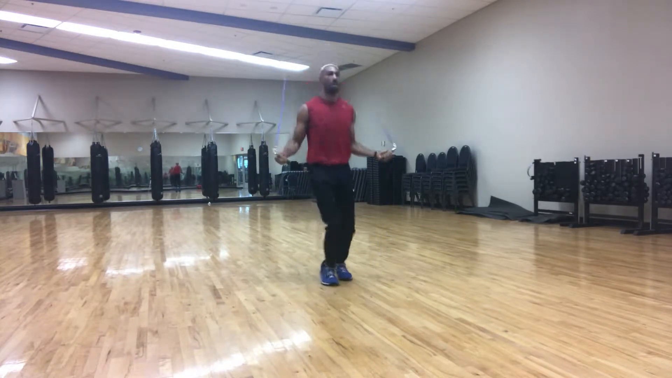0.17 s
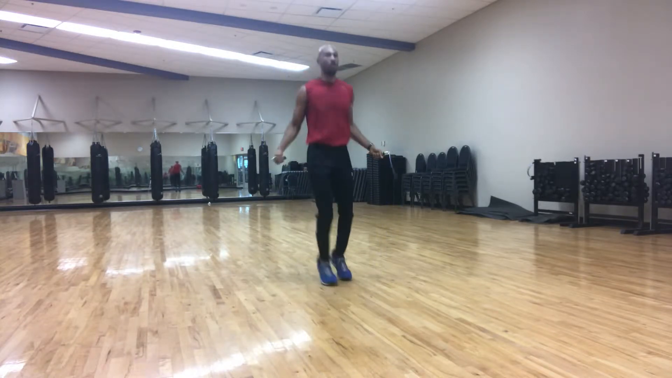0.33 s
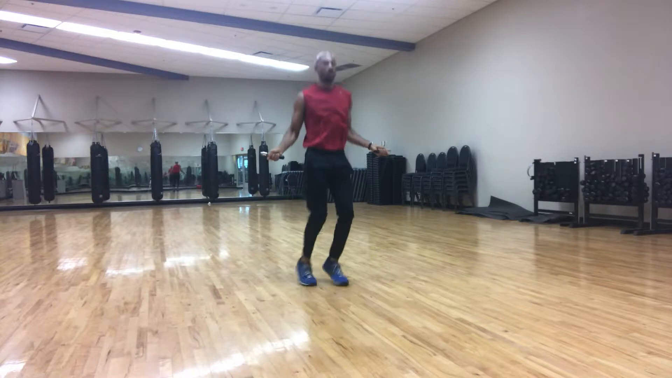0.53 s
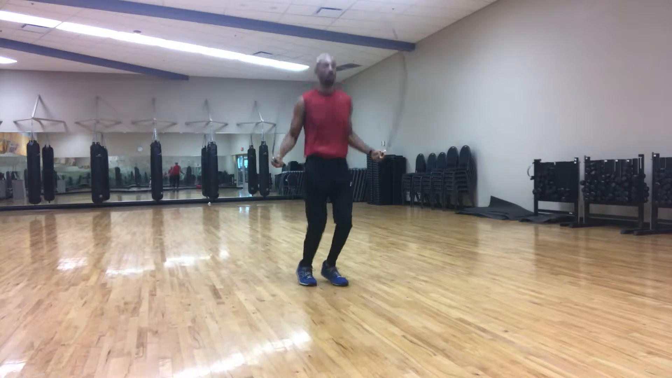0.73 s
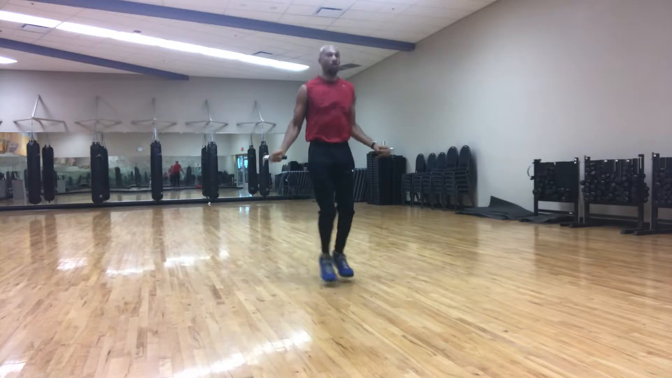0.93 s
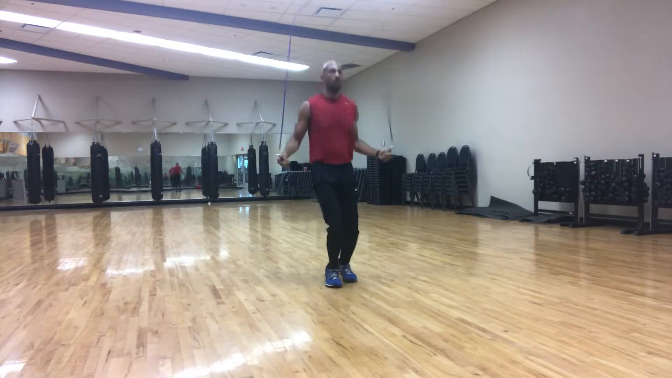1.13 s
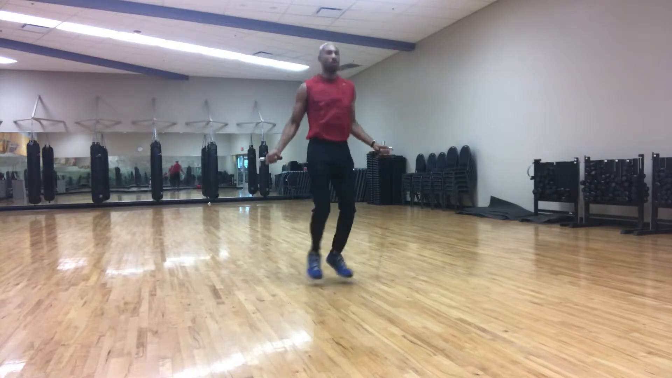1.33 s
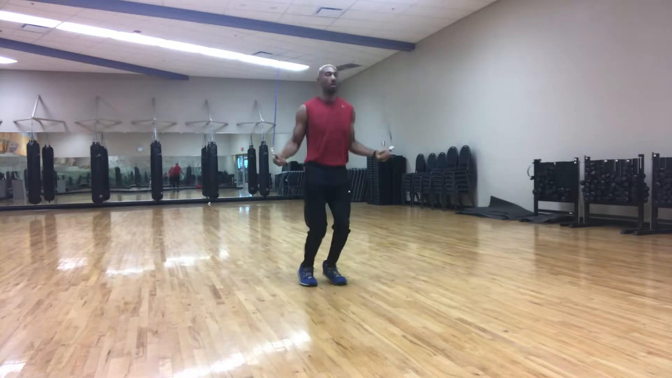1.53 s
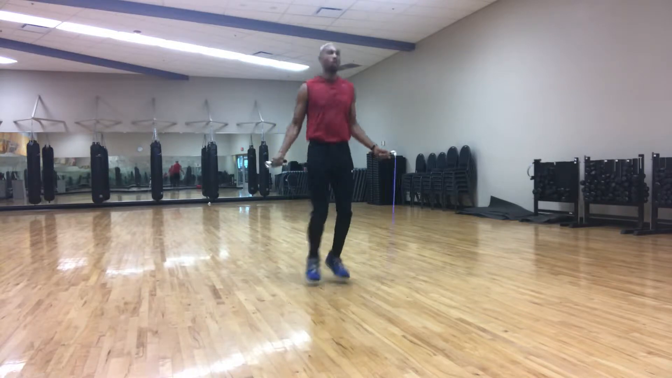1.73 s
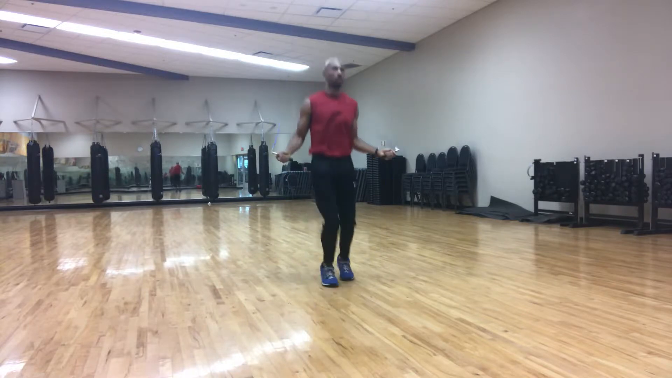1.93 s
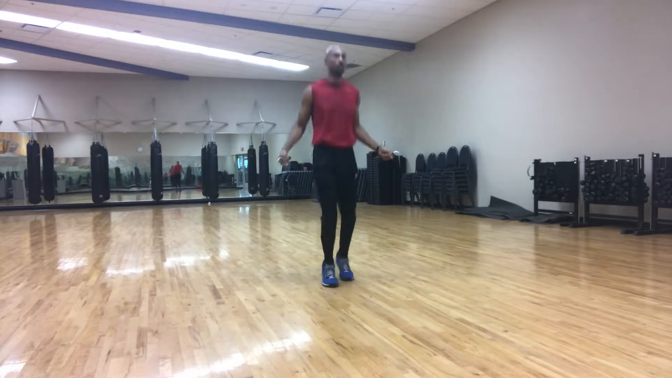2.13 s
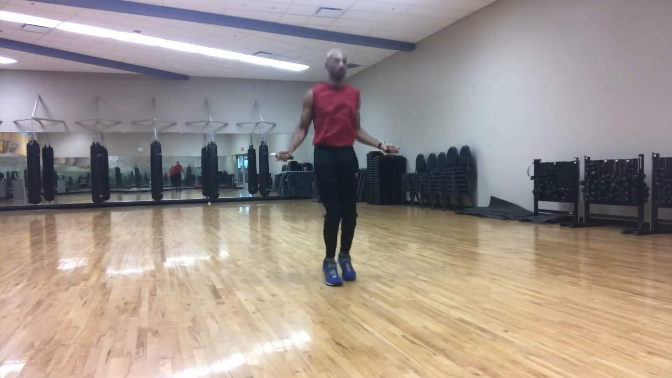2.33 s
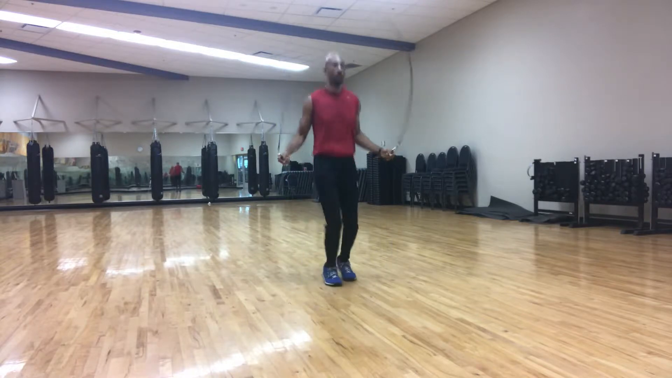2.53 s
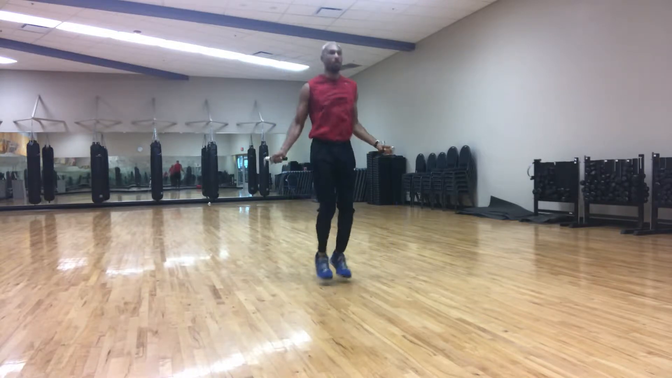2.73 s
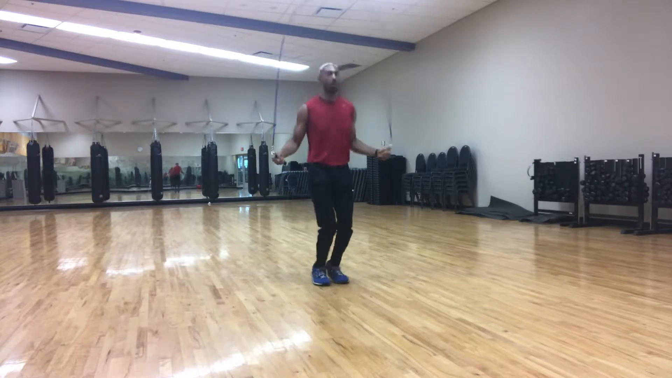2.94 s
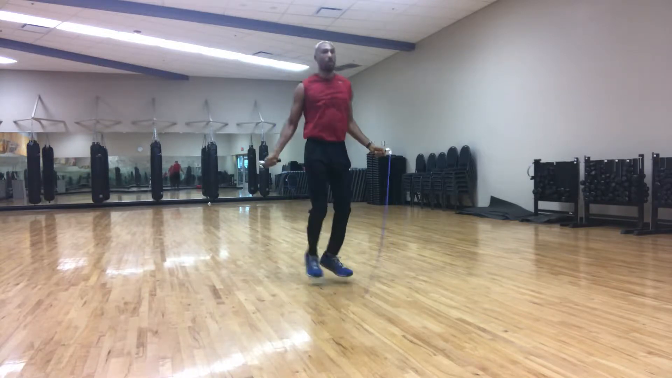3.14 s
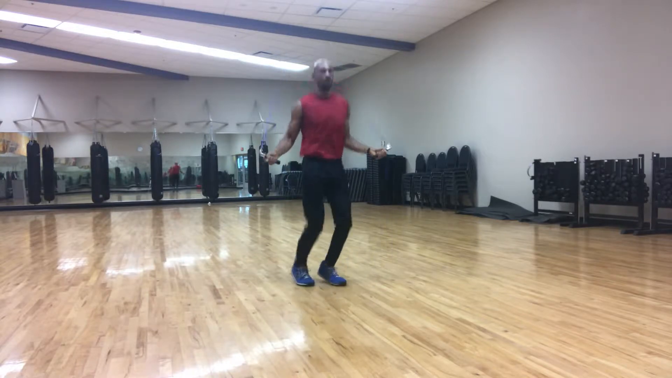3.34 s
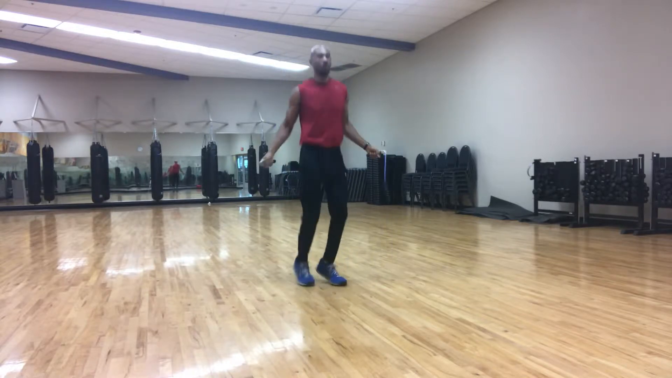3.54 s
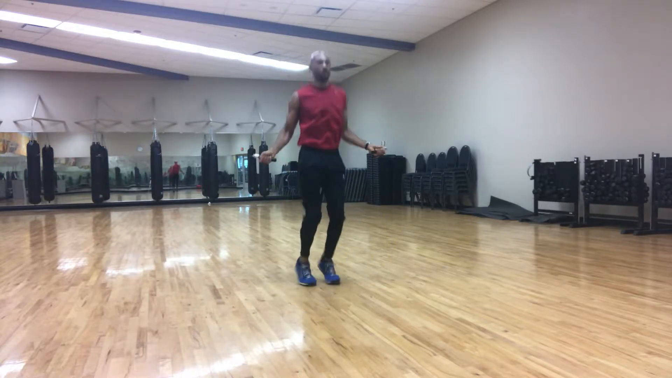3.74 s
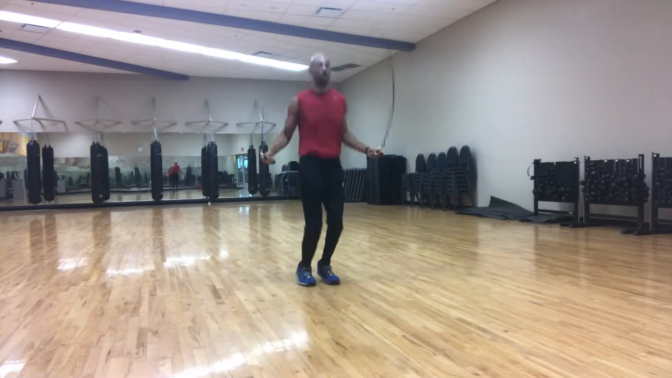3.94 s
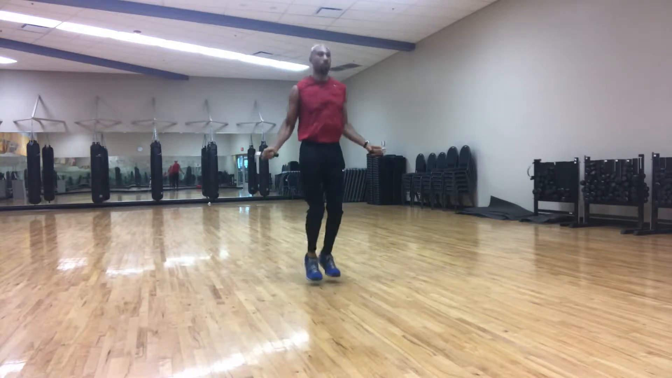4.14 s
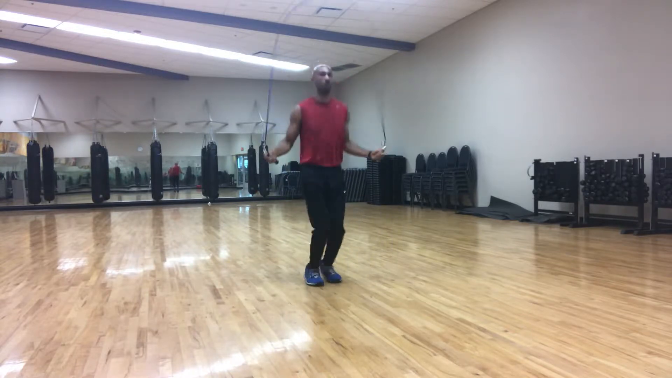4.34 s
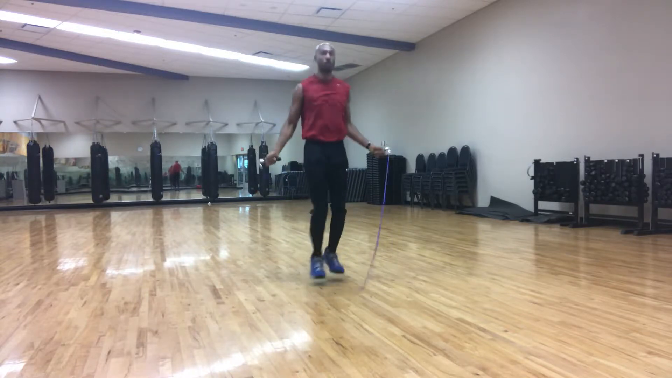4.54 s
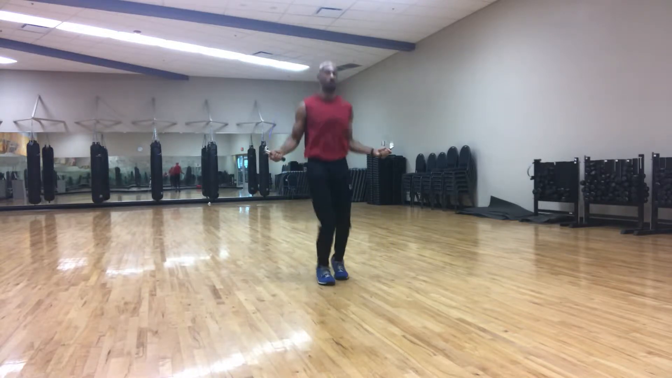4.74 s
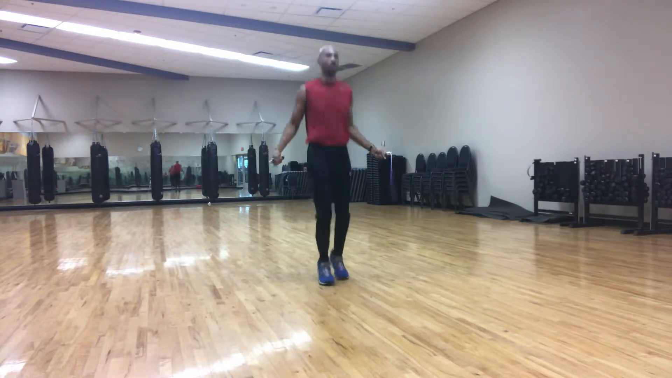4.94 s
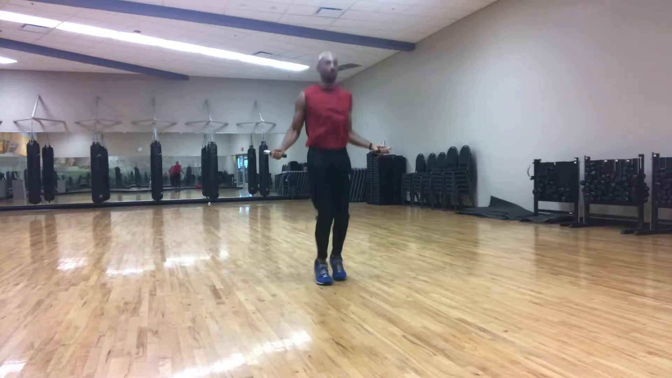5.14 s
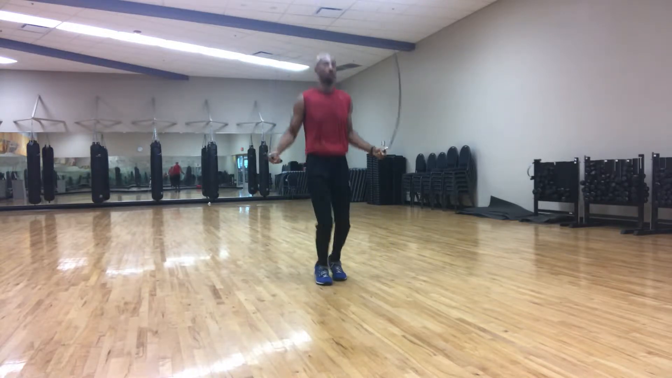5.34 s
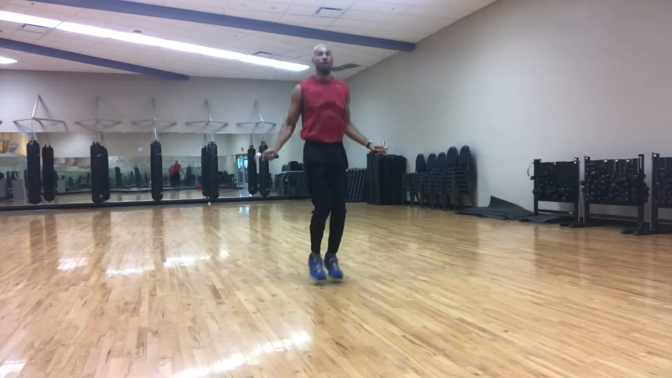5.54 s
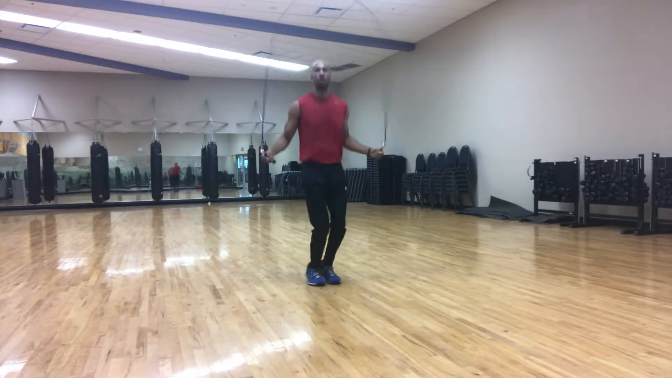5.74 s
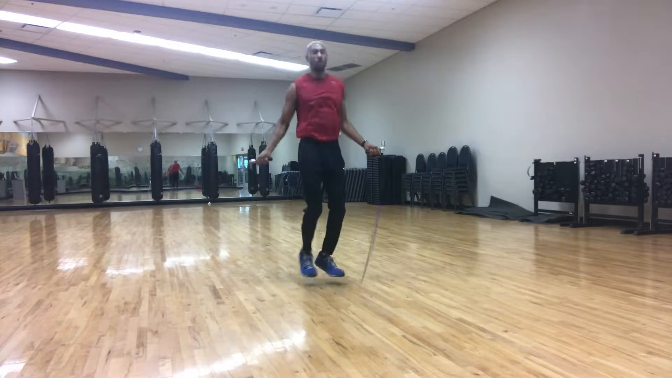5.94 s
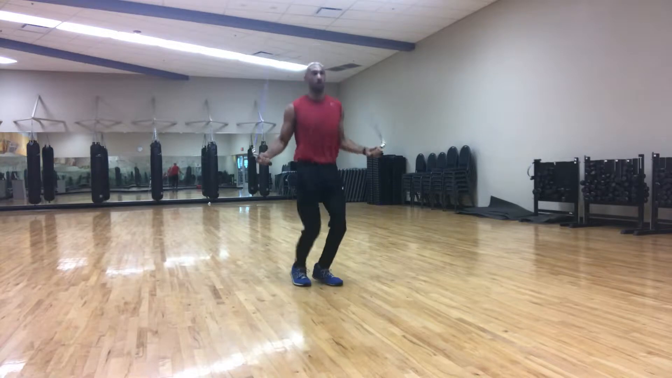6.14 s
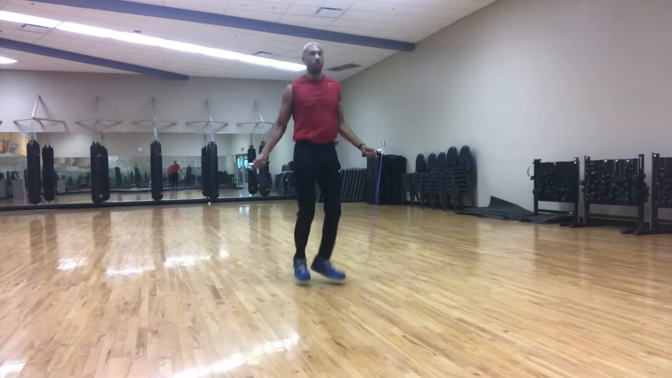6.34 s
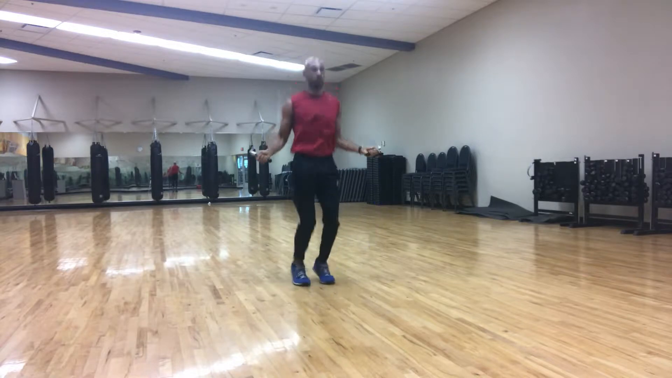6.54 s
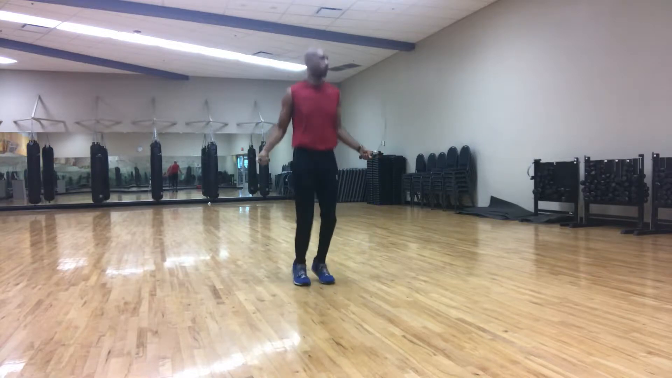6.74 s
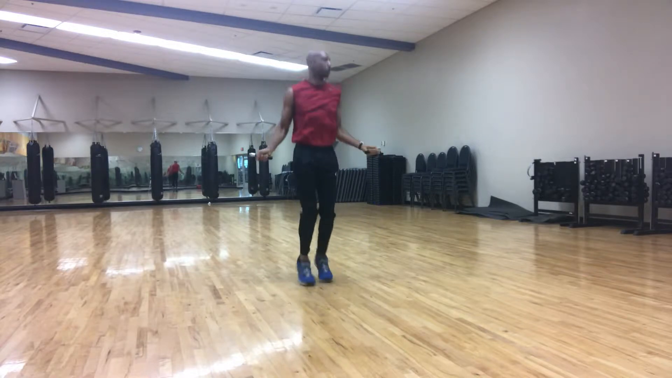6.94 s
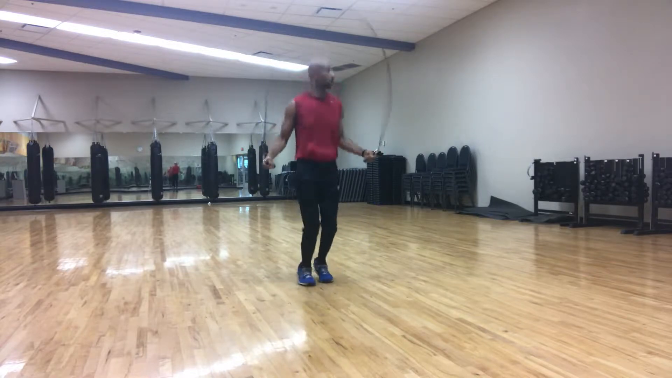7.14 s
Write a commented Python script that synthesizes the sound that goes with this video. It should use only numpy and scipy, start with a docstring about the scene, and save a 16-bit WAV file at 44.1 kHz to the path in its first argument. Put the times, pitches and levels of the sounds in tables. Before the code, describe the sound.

A jump rope cracks on a wooden floor about twice a second, each slap followed by thumping shoes, in an echoing gym.

```python
"""A large gym with a sprung wooden floor, where a heavy jump rope turns a little over twice a second.
Ventilation rumbles underneath. The rope hums through the air and cracks on the boards, sending a
falling chirp through the floor; ceiling and walls throw each crack back. A tenth of a second later
both shoes land with a tap and a boom, and the swivels in the handles rattle."""
import sys
import numpy as np
from scipy import signal
from scipy.fft import rfft, irfft
from scipy.io import wavfile
from scipy.ndimage import uniform_filter1d

SR = 44100
rng = np.random.default_rng(int(sys.argv[2]) if len(sys.argv) > 2 else 0)


def master(y):
    """Save y as 16-bit WAV."""
    cut = np.clip(np.atleast_2d(y).T, -1, 1)
    pcm = np.round(cut * 32767)  # scale
    wavfile.write(sys.argv[1], SR, pcm.astype(np.int16))


N = 316622
SIZE, LEAD = 8192, 1024  # one-shot length and its pre-roll [samples]
HZ = np.maximum(np.fft.rfftfreq(SIZE, 1 / SR), 1)

# the rope hitting the floor, one row a turn:
# (time [s], crack level [dB], board ring over the crack [dB], ring pitch [Hz], ceiling echo [dB])
SLAPS = [(-0.44, 0, 10, 1300, 0), (0.0186, -.2, 8.5, 1315, -4.5), (0.4779, 2.1, 16.5, 1370, -1.5),
         (0.9417, 3, 12, 1318, -2.5), (1.4039, .3, 12.5, 1266, -5.5), (1.8537, 2, 15.7, 1350, -2.5),
         (2.3186, 1.1, 16.2, 1257, -.3), (2.7767, 0.5, 12, 1224, -3.5), (3.236, 0.7, 9.7, 1250, -5),
         (3.706, -1.5, 11.3, 1270, -1.5), (4.1791, -0.6, 10.5, 1460, -6), (4.639, 1.14, 7, 1530, -5.5),
         (5.1002, 1.1, 8.5, 1220, -2), (5.5706, -1, 7, 1480, -4), (6.016, .4, 11, 1290, -5),
         (6.4723, 1.8, 13, 1290, -3), (6.9312, .5, 13, 1292, -3.5)]


def amp(db):
    return 10 ** (np.asarray(db) / 20)


def curve(points, hz):
    """A table's value at hz, on a log-frequency axis."""
    f, value = np.transpose(points)
    return np.interp(np.log(hz + 1), np.log(f), value)


def bell(centre_hz, octaves):
    """A bell-shaped spectrum of height 1."""
    return np.exp(-.5 * (np.log2(HZ / centre_hz) / octaves) ** 2)


def add(mix, s, sound):
    """Mixes in a one-shot so that its onset, after the pre-roll, lands at s seconds."""
    at = round(s * SR) - LEAD
    sound = sound[max(-at, 0):]
    part = mix[max(at, 0):][:len(sound)]
    part += sound[:len(part)]


def pulse(gain, delay=0, phase=0):
    """One transient with the given spectrum; each frequency may arrive at its own delay [s]."""
    lag = 2 * np.pi * np.cumsum(delay * np.ones(len(HZ))) * SR / SIZE
    return np.roll(irfft(gain * np.exp(1j * (phase - lag))), LEAD)


def burst(gain, decay, rise):
    """A scattered transient: a short swell of noise with the given spectrum."""
    t = np.arange(SIZE) / SR
    grains = rng.standard_normal(SIZE) * np.exp(-t / decay) * (1 - np.exp(-t / rise))
    return pulse(gain * rfft(grains / np.linalg.norm(grains)))


def bending_delay(travel, sonic_hz):
    """Bending waves in the floor run as the root of frequency: the bass lags the airborne sound."""
    return travel * (np.sqrt(sonic_hz / np.maximum(HZ, 40)) - 1)


def turn_times():
    """When each turn of the rope begins; the last turn is as long as the one before."""
    times = np.transpose(SLAPS)[0]
    return np.append(times, 2 * times[-1] - times[-2])


def hall(spectrum, gap=0.022, build=.008, patchy_db=1.5):
    """A diffuse tail that builds after a gap; echoes bunch at random and the treble dies first."""
    # the gym's reverb time: (frequency [Hz], T60 [s])
    t60 = [(60, 1.07), (200, 1.24), (700, 1.31), (3500, 1.273), (6500, 0.88), (10000, 0.66), (16000, 0.57)]
    hz, t, bands = signal.stft(rng.standard_normal(SIZE * 5) / np.sqrt(SR), SR, nperseg=1024)
    age = np.maximum(t - LEAD / SR, 0)
    patches = uniform_filter1d(rng.standard_normal(bands.shape), size=12, axis=0)
    bands = bands * amp(curve(spectrum, hz)[:, None] - 60 * age / curve(t60, hz)[:, None])
    tail = signal.istft(bands * amp(patchy_db * patches / patches.std()), SR)[1]
    since_gap = np.maximum((np.arange(len(tail)) - LEAD) / SR - gap, 0)
    return tail * (1 - np.exp(-since_gap / build))


def ventilation(hum_hz=62.1, hum_db=-60):
    """The room tone: steady air noise and a low motor hum."""
    # rumble of the moving air: (frequency [Hz], level [dB])
    air_eq = [(20, -20), (40, 16), (60, 18), (80, 9.5), (100, -4), (140, -1), (190, 0), (350, 14),
              (600, -0.5), (1500, -16), (4000, -9.5), (9000, -26), (16000, -32)]
    gain = amp(curve(air_eq, np.fft.rfftfreq(N, 1 / SR)))
    air = irfft(rfft(rng.standard_normal(N)) * gain, N) / np.sqrt(SR)
    return air + amp(hum_db) * np.sin(2 * np.pi * hum_hz * np.arange(N) / SR)


def rope_whoosh(width_hz=27, rough=.95, wander_hz=6, wet_db=2, trim_db=-2.0, hz_per_db=2.5):
    """Vortices shed by the rope make a fuzzy tone that follows its speed; quick, hard turns go higher."""
    # the air tone from slap to slap: (position in the turn [0-1], pitch [Hz], level [dB])
    swing = [(0, 450.2, -48), (.12, 420.1, -54.5), (.19, 372.2, -46.5), (.25, 378, -39.3),
             (.34, 385, -49.5), (.48, 372.1, -48.5), (.59, 392, -46.5), (.7, 384.9, -55.5), (.76, 385, -49),
             (.83, 408.1, -47.5), (.88, 420, -51.5), (.94, 440, -43.5), (1, 452, -47.5)]
    # how hard the rope is driven: (time [s], level [dB])
    effort = [(0, -1), (1.4, 0), (2.3, -1), (2.85, 3), (3.4, 0), (4.3, -2.5), (5.1, 3), (6.5, 1), (7.1, -3)]
    t = np.arange(N) / SR
    times = turn_times()
    turn = np.interp(t, times, np.arange(len(times))) % 1
    lengths = np.diff(times)
    speed = np.interp(t, times[:-1] + lengths / 2, lengths.mean() / lengths)
    effort_db = np.interp(t, *np.transpose(effort))
    downswing = np.cos(np.pi * turn) ** 2  # the arms speed the rope up on its way to the floor
    wander = np.interp(t, times, rng.standard_normal(len(times)))
    position, hz, db = np.transpose(swing)
    pitch = np.interp(turn, position, hz) * speed + hz_per_db * effort_db * downswing + wander_hz * wander
    lowpass = signal.butter(2, width_hz, fs=SR, output="sos")
    fuzz = signal.sosfilt(lowpass, rng.standard_normal((2, N + SIZE)))[:, SIZE:]
    flutter = 1 + rough * (fuzz[0] + 1j * fuzz[1]) / fuzz.std()
    tone = (flutter * np.exp(2j * np.pi * np.cumsum(pitch) / SR)).real
    tone *= amp(trim_db + np.interp(turn, position, db) + effort_db) / tone.std()
    reverb = hall([(100, wet_db), (1000, wet_db)])
    return tone + signal.fftconvolve(tone, reverb)[LEAD:LEAD + N]


def handle_rattles(turn_share=0.251, over_crack_db=0.6, variants=4):
    """The swivels rattle a quarter turn after each slap, in step with its level, and sometimes tick."""
    # stray swivel ticks just before the rope lands: (time [s], level [dB])
    ticks = [(2.307, -18), (4.619, -12), (6.459, -14)]
    # resonances of the handles: (frequency [Hz], level [dB])
    handle_eq = [(500, -3), (1800, -15.5), (2200, 0), (2600, -14.5), (4400, -5), (5200, -12), (8000, -22.5),
                 (9700, -11.5), (12200, -14), (13000, -18), (16000, -31)]
    out = np.zeros(N)
    tails = [hall(handle_eq, gap=.003, build=.005) for _ in range(variants)]
    rattles = [(s + turn_share * length, crack_db + over_crack_db)
               for (s, crack_db, *_), length in zip(SLAPS, np.diff(turn_times()))]
    for k, (s, db) in enumerate(rattles + ticks):
        swivel = amp(db + curve(handle_eq, HZ))
        add(out, s - .0008, burst(swivel, decay=.002, rise=.0016))
        add(out, s + 0.0091, amp(-7.5) * burst(swivel, decay=.007, rise=0.0011))
        add(out, s, amp(db + 3.5) * tails[k % variants])
    return out


def shoe_hits(lighter_tap_db=-3.5, lighter_thump_db=-2.5):
    """Every landing is two shoes, a moment apart, one of them lighter."""
    # the landings; the floor's pitch varies with the spot:
    # (time [s], lighter shoe's lag [s], sole tap [dB], tap pitch [Hz], thump [dB], floor pitch [Hz])
    landings = [(-0.33, 0.0096, 0, 1000, 6, 170), (0.1218, 0.00382, -7, 1050, 3, 190),
                (0.5932, .01, .7, 980, -1.8, 170), (1.0441, 0.0088, -1.5, 900, 7.5, 156),
                (1.4984, 0.0056, -2.5, 1100, 0, 155), (1.9606, .0226, .3, 950, 5, 195),
                (2.423, .0144, 3, 1200, 5.5, 185), (2.882, .006, 1, 850, -1.5, 185),
                (3.3524, .0023, 2, 870, 2, 135), (3.8087, .0151, 1.2, 1160, 4, 163),
                (4.2773, .0185, -0.9, 1050, 1.5, 200), (4.7546, .0101, -2.7, 930, 6.5, 202),
                (5.2123, 0.017, 0, 740, .3, 175), (5.6865, -.0111, 4, 830, .5, 175),
                (6.1297, .0123, -1, 750, .8, 150), (6.5715, .015, 5, 1250, 3.6, 150),
                (7.0448, 0.0045, 2.6, 960, 3.6, 165)]
    for s, lag, tap_db, tap_hz, thump_db, floor_hz in landings:
        yield s, tap_db, tap_hz, thump_db, floor_hz
        yield s + lag, tap_db + lighter_tap_db, tap_hz, thump_db + lighter_thump_db, floor_hz


def footfalls(usual_floor_hz=170, variants=4):
    """Each sole taps the wood, and the weight behind it makes the sprung floor and the room boom."""
    # low standing waves of the gym: (frequency [Hz], level [dB], T60 [s])
    room_modes = [(132.8, -58.5, 0.96), (163.5, -59.5, 1.2), (174.8, -53, 1.17), (194.3, -55, 1.3)]
    # the floor's thump at its usual pitch: (frequency [Hz], level [dB])
    thump_eq = [(35, -2), (80, 3), (130, 9.5), (190, 10.5), (280, 0), (400, -12), (600, -4), (2000, -44),
                (6000, -48)]
    # reverb of the thump: (frequency [Hz], level [dB])
    thump_reverb_eq = [(35, 21.5), (90, 18.5), (170, 22.5), (260, 14.5), (380, 13.5), (520, -4.5),
                       (1000, -10.5), (3000, -39)]
    # reverb of the sole's tap: (frequency [Hz], level [dB])
    sole_reverb_eq = [(200, -4), (600, 8), (1000, 5), (2000, -4), (4500, -6), (9000, -31), (16000, -20)]
    out = np.zeros(N)
    t = np.maximum(np.arange(SR) - LEAD, 0) / SR
    boom = sum(amp(db - 60 * t / t60) * np.sin(2 * np.pi * hz * t) for hz, db, t60 in room_modes)
    sole_tails = [hall(sole_reverb_eq, gap=.004, build=0.0055) for _ in range(variants)]
    for k, (s, tap_db, tap_hz, thump_db, floor_hz) in enumerate(shoe_hits()):
        sole = amp(tap_db) * (bell(tap_hz, octaves=0.51) + amp(-23) * bell(3490, octaves=1.1))
        add(out, s, amp(1) * pulse(sole, phase=1.64))
        add(out, s + .014, amp(-4.5) * burst(sole, decay=0.008, rise=0.00033))
        add(out, s, amp(tap_db) * sole_tails[k % variants])
        tuning = floor_hz / usual_floor_hz
        body = amp(thump_db + curve(thump_eq, HZ / tuning))
        thump = pulse(body, bending_delay(travel=0.003416, sonic_hz=1407))
        add(out, s, thump)
        add(out, s + .014, amp(-7.5) * thump)  # off the ceiling
        add(out, s + 0.01003, amp(thump_db) * boom)
        tuned_reverb_eq = [(hz * tuning, db) for hz, db in thump_reverb_eq]
        add(out, s, amp(thump_db - 1) * hall(tuned_reverb_eq, gap=0.0083, build=0.017))
    return out


def rope_slaps(alike=0.29, send_db=-0.4, ripple_db=9.5, ripple_hz=107.8, ripple_s_per_octave=0.0379):
    """The rope cracks on the boards, a falling chirp runs through the floor, and the room answers."""
    # the crack of rope on wood: (frequency [Hz], level [dB])
    crack_eq = [(60, -9), (400, -4), (700, -2), (950, 9), (1200, 0), (1650, 1), (2000, 3), (2600, -2.5),
                (4000, -0.5), (6500, 3), (9000, -6), (12000, -7), (16000, -25)]
    # the bending wave in the boards: (frequency [Hz], level [dB])
    chirp_eq = [(40, -13), (90, 5), (130, 8.5), (210, 14.5), (290, 1.5), (380, 13.5), (490, -5.5), (590, 6),
                (750, -5), (1000, -11.5), (2500, -42)]
    # the chatter of the boards: (frequency [Hz], level [dB])
    chatter_eq = [(200, -5), (700, -3), (1500, 0), (2800, -3.5), (4000, 0.5), (6500, -4), (9000, -11.5),
                  (16000, -26)]
    # the slapback from the ceiling: (frequency [Hz], level [dB])
    ceiling_eq = [(300, -15), (1000, -4), (2500, -7.5), (3800, 2), (6000, 8), (7300, 5.5), (9500, -6),
                  (12000, -10), (16000, -25)]
    # early echoes off walls and racks: (delay [s], level [dB], centre [Hz], width [octaves], smear [s])
    echoes = [(.019, -8.5, 6470, 1.0, .0008), (.021, -3, 3000, 1.33, .001),
              (0.029, -3.5, 3120, 0.38, .0015), (0.03, 2, 3360, .4, 0.0024), (.034, -3, 4100, 0.71, .007),
              (.078, -2.2, 3560, 0.33, .0075)]
    # reverb of the crack: (frequency [Hz], level [dB])
    reverb_eq = [(40, 16), (130, 18.5), (380, 20.5), (600, 12.5), (1300, 13.5), (2200, 12), (3500, 15.5),
                 (6300, 13), (9000, 6.5), (12000, 2), (16000, -7)]
    out = np.zeros(N)
    # a slow, deep ripple crosses the sprung floor, its lowest notes last
    ripple_delay = 0.0279 + ripple_s_per_octave * np.log2(ripple_hz / HZ)
    ripple = pulse(amp(ripple_db) * bell(ripple_hz, octaves=0.37), ripple_delay)
    chirp = pulse(amp(curve(chirp_eq, HZ)), bending_delay(travel=0.00338, sonic_hz=1403), phase=-2.1)
    ceiling = amp(curve(ceiling_eq, HZ))
    shared_tail = hall(reverb_eq, gap=0.011, build=0.0037)
    for s, crack_db, ring_db, ring_hz, ceiling_db in SLAPS:
        # the boards knock at one pitch and hold that energy back for a moment
        knock = bell(ring_hz, octaves=0.2)
        crack = amp(crack_db + curve(crack_eq, HZ) + ring_db * knock)
        add(out, s, pulse(crack, delay=.0001 * knock, phase=1.53))
        add(out, s, amp(crack_db) * (chirp + ripple))
        # fast waves in the wood arrive just ahead of the crack, and the boards chatter on after it
        chatter = amp(crack_db + curve(chatter_eq, HZ))
        add(out, s - .0052, amp(-3.5) * burst(chatter, decay=0.0043, rise=0.0055))
        add(out, s + .0025, amp(-1.5) * burst(chatter, decay=0.0046, rise=0.000094))
        ring = amp(crack_db + ring_db - 9.0) * bell(ring_hz, octaves=0.26)
        add(out, s + 0.00089, burst(ring, decay=.0016, rise=.0002))
        # the ceiling returns a bright, sharp copy, and its beams scatter a softer one
        slapback = pulse(ceiling, delay=0.000183 * np.log2(HZ / 6000), phase=rng.uniform(-np.pi, np.pi))
        add(out, s + .014, amp(ceiling_db) * slapback)
        add(out, s + .0143, amp(ceiling_db - 6.0) * burst(ceiling, decay=0.0017, rise=.0001))
        add(out, s + .0135, amp(crack_db - 6) * chirp)
        hall_db = crack_db + send_db
        for delay, echo_db, hz, octaves, smear in echoes:
            add(out, s + delay, amp(hall_db + echo_db) * burst(bell(hz, octaves), smear, rise=0.000083))
        # the rope lands near the same spot, so part of the tail is the same every turn
        fresh_tail = hall(reverb_eq, gap=0.01, build=0.0023)
        tail = np.sqrt(alike) * shared_tail + np.sqrt(1 - alike) * fresh_tail
        add(out, s, amp(hall_db) * tail)
    return out


def scene():
    """All sources, mixed at one microphone."""
    return (rope_slaps() + footfalls() + handle_rattles() + rope_whoosh() + ventilation())[None]


def record(dry, low_cut_hz=40, high_cut_hz=16300):
    """The microphone's port cuts two narrow dips; the deepest bass and the very top are rolled off."""
    # notches of the port: (centre [Hz], width [Hz], gain [dB])
    dips = [(4904, 330, -4.5), (10530, 380, -5)]
    hz = np.fft.rfftfreq(N, 1 / SR)
    port = amp(sum(db * np.exp(-.5 * ((hz - centre) / width) ** 2) for centre, width, db in dips))
    notched = irfft(rfft(dry) * port, N)
    low_cut = signal.butter(4, low_cut_hz, "high", fs=SR, output="sos")
    high_cut = signal.firwin(255, high_cut_hz, window=("kaiser", 9), fs=SR)
    return signal.oaconvolve(signal.sosfilt(low_cut, notched), high_cut[None], "same")


dry = scene()
out = record(dry)
master(out)
```